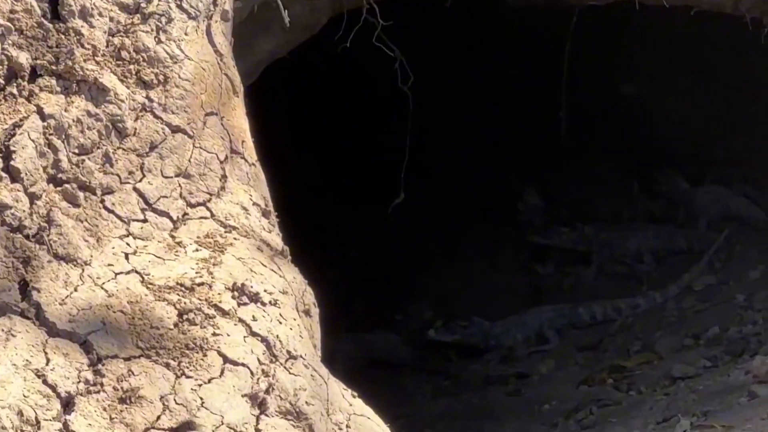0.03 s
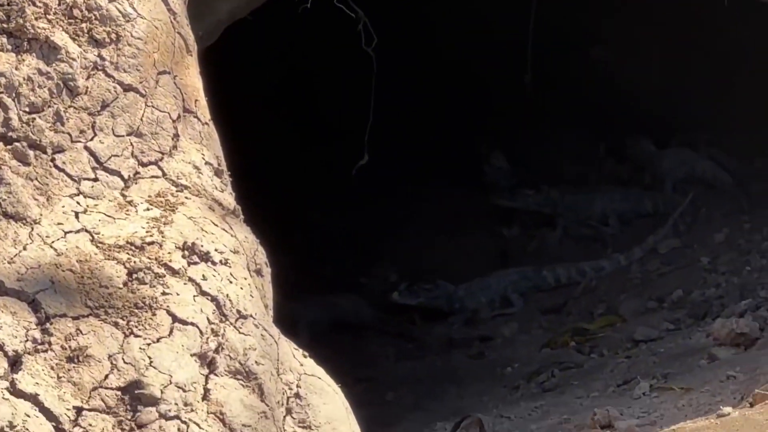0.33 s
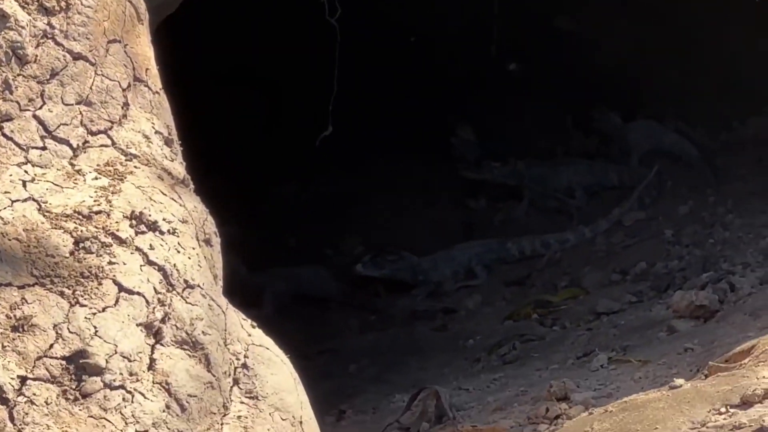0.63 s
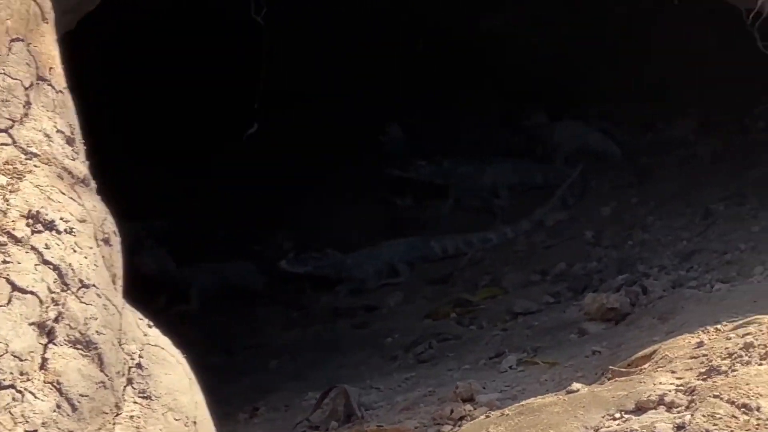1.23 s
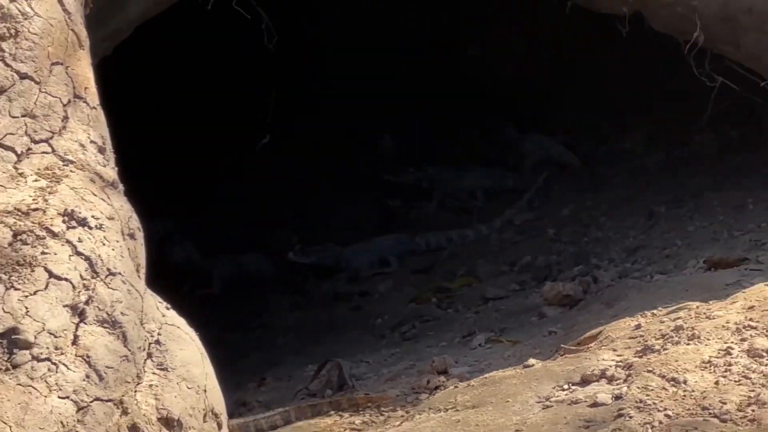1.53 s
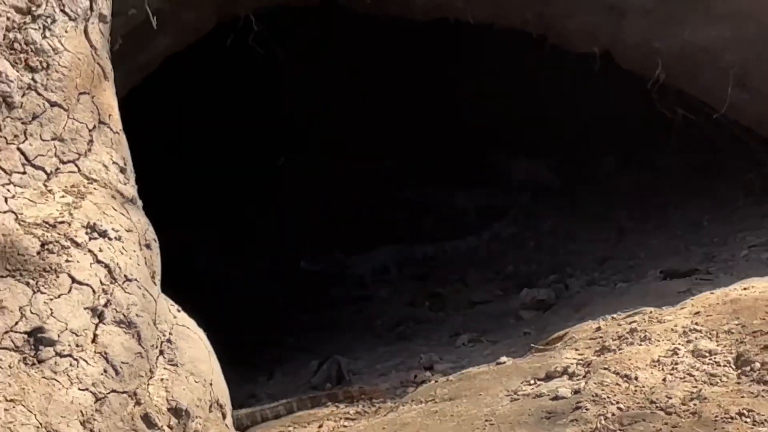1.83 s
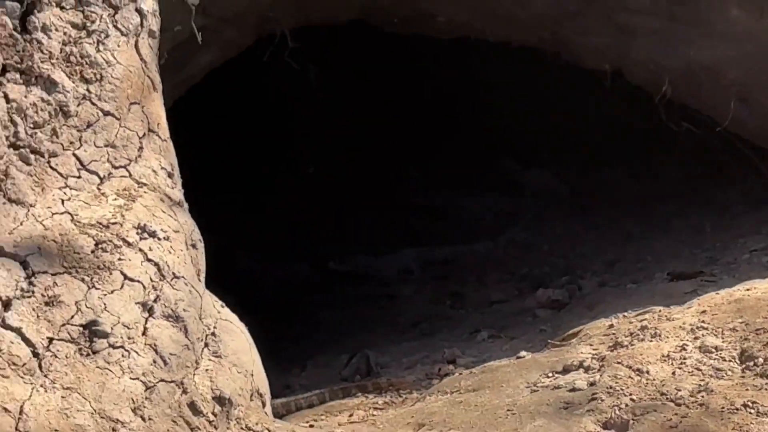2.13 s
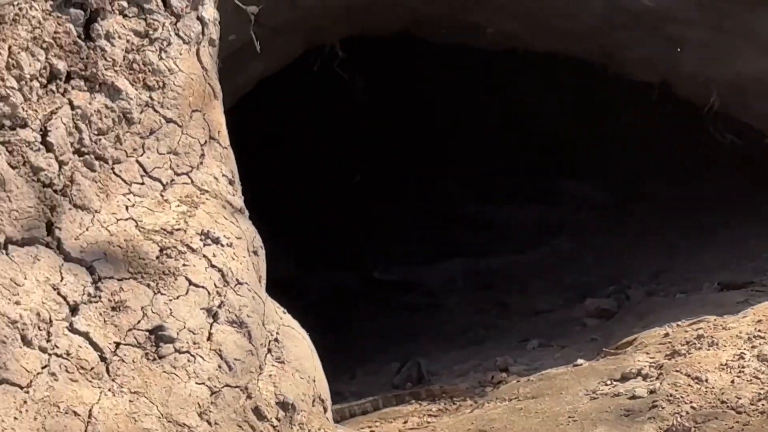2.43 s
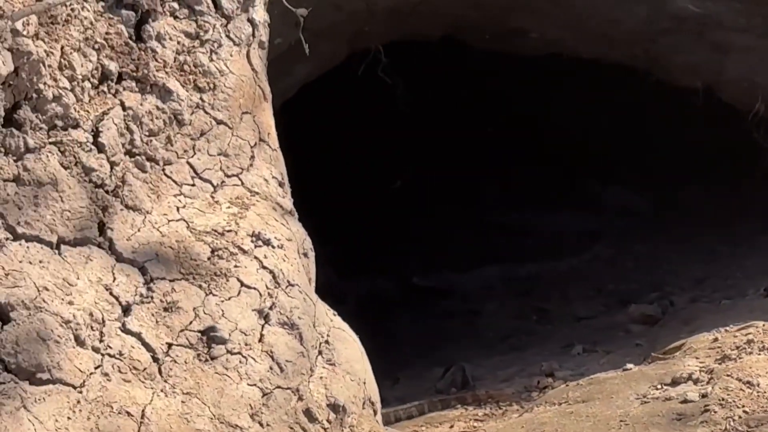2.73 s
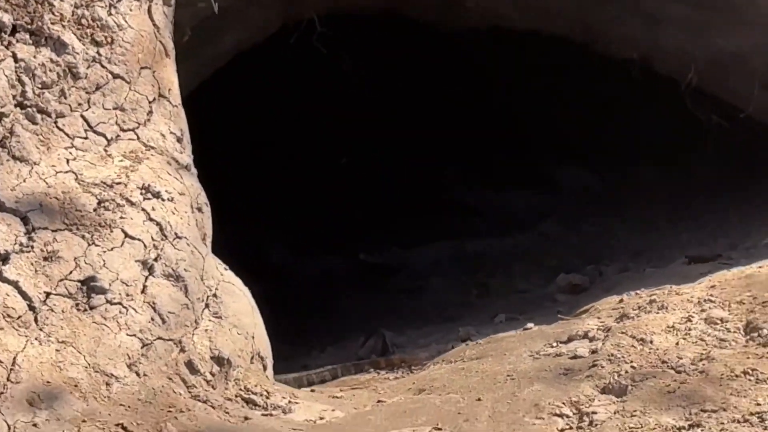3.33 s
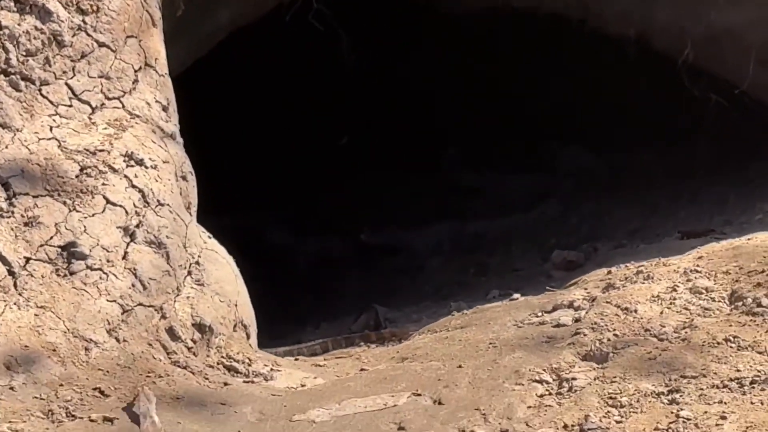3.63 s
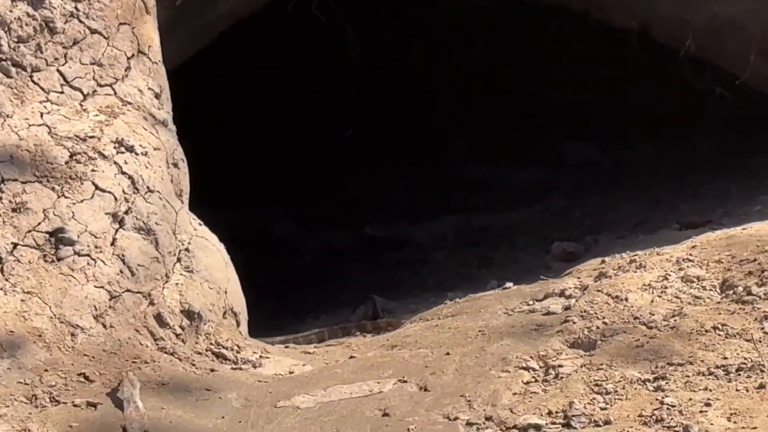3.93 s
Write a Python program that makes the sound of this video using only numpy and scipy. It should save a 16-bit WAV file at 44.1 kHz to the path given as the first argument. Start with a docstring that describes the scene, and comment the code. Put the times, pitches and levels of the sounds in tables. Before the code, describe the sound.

Soft, short honks of young alligators overlap amid high insect buzzing and faint camera rumble.

```python
"""Young alligators honk softly from a den in a dry mud bank: short arched calls and falling yelps,
each a run of harmonics through a narrow throat resonance, overlap and ring in the hollow.
Two insects buzz high in the grass close by, pulsing with their wing strokes, over a distant chorus
and a light wind. The microphone is on a hand-held camera that rumbles and is bumped now and then;
dry soil scuffs faintly near it."""
import sys
import numpy as np
from scipy import signal
from scipy.fft import rfft, irfft, next_fast_len
from scipy.io import wavfile
from scipy.ndimage import uniform_filter1d, map_coordinates

SR = 44100
rng = np.random.default_rng(int(sys.argv[2]) if len(sys.argv) > 2 else 0)


def transcribe(signal):
    """Save signal, clipped to [-1, 1], as a 16-bit WAV file at the path in sys.argv[1]."""
    frames = np.atleast_2d(signal).T
    limited = np.clip(frames, -1, 1)
    pcm = np.round(limited * 32767).astype(np.int16)
    wavfile.write(sys.argv[1], SR, pcm)


N = 176400

# light wind, common to both channels (mid) and opposed between them (side): (frequency [Hz], level [dB])
WIND_MID_COLOUR = [(30, -12.5), (200, 6.5), (400, 0), (600, 0), (1200, -3), (2400, -3), (3000, -4.5),
                   (4000, -10), (5000, -16.5), (7000, -4), (12000, -29.5)]
WIND_SIDE_COLOUR = [(30, -10), (70, -10), (150, 8.5), (300, 8.5), (600, 11.5), (1000, 7.5), (1600, 7),
                    (2200, -53), (4000, -41), (9000, -25)]
# scuffs near the microphone: (time [s], length [s], level [dB])
SOIL_SCUFFS = [(0.613, 0.0081, -61), (1.04, 0.0071, -77), (2.109, 0.015, -60), (2.803, 0.092, -62),
               (3.492, .012, -70)]
# dry soil: (frequency [Hz], level [dB])
SOIL_COLOUR = [(150, -9), (400, -3.5), (750, -1.5), (1200, -19), (3000, -66), (9000, -25)]
# bumps on the camera: (time [s], level [dB], pitch [Hz], half length [cycles], rub re bump [dB])
CAMERA_BUMPS = [(1.932, -34, 74.5, 1.3, -32), (1.992, -39.5, 66, 2.2, -28), (2.045, -41, 115, 0.37, -28),
                (2.099, -27, 75.5, 0.61, -23), (2.106, -36, 188, .7, -23), (2.146, -30, 73, .7, -20),
                (2.179, -38.5, 184, 0.68, -31), (2.186, -31.5, 84, 0.54, -24), (2.217, -38, 104, 1, -10),
                (2.439, -35.5, 50.7, 0.96, -28), (2.675, -34.5, 67.4, 1.2, -34),
                (2.716, -27.5, 59.8, 1.16, -28.5), (2.806, -34, 57.3, 0.68, -30),
                (3.46, -32.5, 69.6, 0.74, -28), (3.501, -31.5, 67.5, 1.33, -27),
                (3.523, -35.5, 144, 0.91, -26), (3.574, -34, 81, 0.52, -29), (3.62, -34, 73, 1.4, -42),
                (3.664, -33.5, 74, 0.66, -27), (3.815, -36, 50, 0.83, -36)]
# handling rumble and the rub of the grip: (frequency [Hz], level [dB])
RUMBLE_COLOUR = [(15, -16), (28, -11), (45, -2), (62, 3), (100, -1.5), (160, -10.5), (240, -17.5),
                 (330, -34.5), (600, -53), (2000, -74)]
GRIP_COLOUR = [(70, -33), (130, 21), (220, 3), (300, -8), (450, -24), (900, -44)]
# rumble as the camera moves: (time [s], level [dB])
RUMBLE_SWELL = [(0, -55), (.5, -56), (1.75, -54), (1.95, -47.5), (2.1, -42.5), (2.22, -47), (2.28, -54),
                (2.55, -51.5), (2.72, -44), (2.88, -48.5), (3.38, -52.5), (3.5, -46), (3.68, -49), (4, -54)]
# the two near insects and the distant chorus: (time [s], level [dB])
SLOW_BUZZ_LEVEL = [(0, -53), (.4, -49.5), (.7, -48.5), (1.1, -49.5), (1.58, -47.5), (1.7, -61), (2.1, -51),
                   (2.65, -53.5), (2.87, -48.5), (3.3, -47.5), (3.6, -48), (4, -55)]
FAST_BUZZ_LEVEL = [(0, -47.5), (.55, -47), (.63, -62), (1.08, -64), (1.24, -45.5), (1.63, -47.5),
                   (1.68, -56), (2.25, -74), (2.36, -47), (2.82, -45), (2.95, -55), (3.42, -58),
                   (3.55, -47.5), (4, -47)]
FAR_CHORUS_LEVEL = [(0, -51.5), (.4, -48.5), (1.55, -49), (1.75, -50), (2.3, -50), (2.8, -50.5),
                    (3.7, -47.5), (4, -51)]
# the same three insect sounds: (frequency [Hz], level [dB])
SLOW_BUZZ_COLOUR = [(4000, -53), (7000, -27), (9500, -8.5), (11300, -8.5), (12500, 0.5), (13700, 1),
                    (14500, -7.5), (15900, -8.5)]
FAST_BUZZ_COLOUR = [(4000, -54), (8000, -19.5), (10500, -13), (11500, -8), (12500, -12), (13700, -2.5),
                    (15200, -2.5), (15900, -7)]
FAR_CHORUS_COLOUR = [(2000, -37), (5000, -21), (6500, -20.5), (8000, -2.5), (9700, 2), (11300, 5.5),
                     (12800, 1), (15200, 7), (15900, 6)]
# insects at the microphone: (frequency [Hz], phase of left ahead of right [rad])
INSECT_PHASE = [(0, 0), (6500, .3), (8000, 1.15), (9500, 1.8), (11000, 2.35), (12000, 3.03), (13400, 3.24),
                (14200, 3.72), (15800, 4.35)]
# hissy edge of the calls and their diffuse wash in the den: (frequency [Hz], level [dB])
EDGE_COLOUR = [(2000, -10), (3000, 4), (4300, 6), (5700, 11.5), (6500, 10.5), (8000, -31)]
WASH_COLOUR = [(900, -39), (1250, -17), (1430, 6), (1750, 7), (1950, -2.5), (2250, -46), (3000, -32)]
# strength of the hissy edge: (time [s], level re calls [dB])
EDGE_BALANCE = [(0, -35), (2.3, -18.5), (2.9, -15), (3.3, -11.5), (3.7, -11.5), (3.9, -18)]
# alligator calls: (time [s], length [s], time to crest [s], crest pitch [Hz], fall [share of pitch],
# throat resonance [Hz], level [dB], lag of right behind left [ms])
CALLS = [ (.205, .125, 0.037, 322, 0.178, 1520, -69.5, .044),
         (0.214, 0.1, 0.029, 437, 0.154, 1670, -77.5, 0.028), (.51, .115, .04, 486, .23, 1790, -61.5, .021),
         (.51, 0.12, 0.064, 375, 0.038, 1380, -62.5, 0.13), (.592, .09, .02, 450, .19, 1690, -62, .029),
         (0.717, 0.14, .075, 364, .05, 1740, -68.5, 0.015), (.815, 0.08, .051, 371, .033, 1260, -70, 0.096),
         (.88, .135, .039, 466, .39, 1690, -58.5, .021), (.882, .052, .008, 375, .19, 1380, -63, .14),
         (.912, 0.052, 0.028, 368, 0.049, 1450, -70, .12),
         (1.079, 0.13, 0.062, 353.4, .11, 1740, -64, 0.027),
         (1.1, 0.12, 0.032, 371, 0.034, 1820, -73, .025),
         (1.205, .12, 0.026, 338, 0.22, 1540, -66.5, 0.049),
         (1.327, 0.077, .04, 360, .037, 1610, -71.5, 0.041),
         (1.445, 0.16, 0.043, 472, 0.18, 1770, -65.5, 0.016),
         (1.537, 0.12, 0.025, 328, 0.15, 1520, -64, 0.091),
         (1.553, 0.082, 0.026, 460, .13, 1780, -75, 0.023),
         (1.683, .105, 0.05, 350, 0.031, 1730, -64, 0.017),
         (1.814, 0.093, 0.025, 433, 0.18, 1630, -61.5, 0.028),
         (1.864, 0.07, 0.012, 468, 0.24, 1700, -61.5, 0.02),
         (1.88, 0.072, .021, 379, 0.066, 1510, -65, 0.12),
         (1.897, 0.058, 0.013, 463, 0.15, 1760, -68, 0.023),
         (1.937, 0.043, 0.016, 458, 0.29, 1710, -64, 0.023),
         (1.988, .135, .08, 337, .07, 1670, -64.5, 0.023), (2.06, 0.136, .075, 359, 0.04, 1760, -65, 0.014),
         (2.292, 0.11, .038, 463.5, 0.27, 1735, -59.5, 0.013),
         (2.346, 0.1, 0.013, 492, .18, 1780, -64, 0.016), (2.405, 0.087, .022, 470, .13, 1820, -67, 0.019),
         (2.508, 0.11, .055, 339, 0.043, 1530, -62.5, .067),
         (2.494, 0.15, 0.067, 405, 0.045, 1940, -71.5, 0.019),
         (2.692, 0.094, 0.029, 315, .12, 1530, -71, 0.049),
         (2.891, 0.066, 0.039, 354, 0.024, 1400, -55.5, 0.23),
         (2.971, 0.047, 0.029, 359, .04, 1390, -61, 0.24),
         (2.89, .087, 0.056, 361, 0.089, 1770, -62, 0.027),
         (2.964, 0.06, 0.0145, 450, .17, 1670, -62.5, 0.022),
         (2.953, 0.099, .055, 321, 0.042, 1500, -61, .043),
         (3.04, 0.095, 0.063, 309.6, 0.0074, 1450, -67, 0.093),
         (3.09, 0.12, 0.07, 356, 0.026, 1730, -61.5, 0.025),
         (3.11, 0.11, 0.069, 388, 0.045, 1395, -64, 0.13),
         (3.234, .12, 0.057, 352.5, 0.095, 1360, -62.5, 0.2),
         (3.255, .09, .045, 352, 0.044, 1720, -69.5, .025), (3.318, 0.052, .03, 316, .03, 1560, -62, 0.049),
         (3.393, 0.053, 0.0081, 442, 0.13, 1700, -69, 0.027),
         (3.407, 0.1, .056, 317.5, .023, 1620, -65.5, 0.034),
         (3.56, 0.11, 0.047, 350, 0.059, 1620, -62.5, 0.036),
         (3.646, 0.084, 0.034, 470, 0.17, 1710, -58, 0.03),
         (3.708, 0.08, 0.019, 465, 0.2, 1760, -62, 0.017),
         (3.709, .12, 0.047, 402, 0.086, 1850, -67.5, 0.018),
         (3.837, 0.12, .072, 356, 0.051, 1740, -58.5, 0.032),
         (3.912, 0.11, 0.038, 367, 0.15, 1430, -59.5, 0.16)]

OPPOSED = np.array([[1], [-1]])  # left, right


def amp(db):
    """Decibels to gain."""
    return 10 ** (np.asarray(db) / 20)


def unit(x):
    """x at rms 1."""
    return x / np.sqrt(np.mean(x ** 2) + 1e-20)


def curve(rows):
    """(time [s], value) points as one value per sample."""
    return np.interp(np.arange(N) / SR, *np.transpose(rows))


def wobble(rate, size=N):
    """A smooth random curve, rate knots a second."""
    return map_coordinates(rng.standard_normal(4000), [np.arange(size) * rate / SR + 3], mode='wrap')


def filtered(x, response):
    """x through a response given as a function of frequency."""
    size = next_fast_len(N + 8192)
    return irfft(rfft(x, size) * response(np.fft.rfftfreq(size, 1 / SR)), size)[..., :N]


def noise(colour):
    """Noise of rms 1, shaped by (frequency [Hz], level [dB]) points."""
    points_hz, db = np.transpose(colour)
    white = rng.standard_normal(N)
    return unit(filtered(white, lambda hz: amp(np.interp(np.log(hz + 1), np.log(points_hz), db))))


def add(track, s, sound):
    """Mix a sound into a track at s seconds."""
    part = track[..., round(s * SR):][..., :sound.shape[-1]]
    part += sound[..., :part.shape[-1]]


def wind(mid_db=-63.5, side_db=-68.5):
    """Light, nearly steady wind over the bank, wide in the low middle and centred above."""
    gust = amp(.92 * wobble(4.24))
    mid = amp(mid_db) * noise(WIND_MID_COLOUR)
    side = amp(side_db) * noise(WIND_SIDE_COLOUR)
    return gust * (mid + OPPOSED * side)


def scuffs():
    """Faint puffs of dry soil near the microphone."""
    t = np.arange(N) / SR
    swell = sum(amp(db) * np.exp(-(2 * (t - s) / length) ** 2) for s, length, db in SOIL_SCUFFS)
    return swell * np.array([noise(SOIL_COLOUR), noise(SOIL_COLOUR)])


def handling(side_db=-25.5):
    """Handling noise on the microphone: a rumble that swells as the camera moves, and dull bumps."""
    t = np.arange(N) / SR
    swell = amp(curve(RUMBLE_SWELL))
    mid = swell * noise(RUMBLE_COLOUR)
    rub = noise(GRIP_COLOUR)
    for s, db, hz, half_length, rub_db in CAMERA_BUMPS:
        cycles = (t - s) * hz
        envelope = amp(db) * np.exp(-(cycles / half_length) ** 2)
        mid += envelope * (np.cos(2 * np.pi * cycles) + amp(rub_db) * rub)
    side = swell * amp(side_db) * noise(RUMBLE_COLOUR)
    return mid + OPPOSED * side


def buzz(level, colour, stroke_hz, drift=.016, swing_db=4, scatter_db=1.1, waver_db=1):
    """One insect close by in the grass: high noise that swells at every wing stroke."""
    strokes = np.cumsum(stroke_hz * (1 + drift * wobble(5.6))) / SR
    pulse_db = swing_db * np.cos(2 * np.pi * strokes) + scatter_db * wobble(46) + waver_db * wobble(9.9)
    return amp(curve(level)) * unit(amp(pulse_db)) * noise(colour)


def insects():
    """Two near insects over a distant chorus; their treble is out of phase between the channels."""
    slow = buzz(SLOW_BUZZ_LEVEL, SLOW_BUZZ_COLOUR, stroke_hz=48.1)
    fast = buzz(FAST_BUZZ_LEVEL, FAST_BUZZ_COLOUR, stroke_hz=65.6)
    chorus = amp(curve(FAR_CHORUS_LEVEL)) * noise(FAR_CHORUS_COLOUR)
    points_hz, phase = np.transpose(INSECT_PHASE)
    return filtered(slow + fast + chorus, lambda hz: np.exp(.5j * OPPOSED * np.interp(hz, points_hz, phase)))


def den(call, echo_db, t60_s=.45):
    """A call plus the short echo of the earth hollow, partly shared by the two channels."""
    t = np.arange(SR // 2) / SR
    tail = rng.standard_normal((2, len(t))) * amp(-60 * t / t60_s)
    tail = tail + .5 * tail[::-1]
    response = amp(echo_db) * tail / np.linalg.norm(tail[0])
    response[:, 0] = 1  # direct path to the microphone
    return signal.fftconvolve(call, response, axes=1)


def den_wash(call_power, wash_db=-7.5, decay_s=.1):
    """A diffuse band of noise that lingers in the den after the calls."""
    pole = np.exp(-1 / (decay_s * SR))
    lingering = np.sqrt(signal.lfilter([1 - pole], [1, -pole], call_power))
    centre = noise(WASH_COLOUR)
    spread = .22 * np.array([noise(WASH_COLOUR), noise(WASH_COLOUR)])
    return amp(wash_db) * lingering * unit(centre + spread)


def honk(length, crest, pitch_hz, fall, throat_hz, lag_ms):
    """One call: harmonics of an arched, slightly rough pitch through a narrow throat resonance."""
    jitter, rasp_db, shimmer_db = .0085, -14, 2
    attack_share, release_share = .4, .28
    throat_width_hz = .82 * pitch_hz
    t = np.arange(int(length * SR)) / SR
    # the pitch climbs on a parabola, steeper in yelps that fall far, then drops ever faster
    scoop = (14 + 210 * fall) * np.minimum(t - crest, 0) ** 2
    past_crest = np.maximum(t - crest, 0) / max(length - crest, .005)
    hz = pitch_hz * (1 - scoop - fall * past_crest ** 1.35)
    hz *= 1 + jitter * wobble(217.6, len(t))
    cycles = np.cumsum(hz) / SR + OPPOSED / 2 * hz * lag_ms / 1000
    voice = 0
    for harmonic in range(1, 10):
        resonance = 1 / (1 + (2 * (harmonic * hz - throat_hz) / throat_width_hz) ** 2)
        rasp = amp(rasp_db) * (wobble(399, len(t)) + 1j * wobble(409.4, len(t)))
        voice += resonance * np.real((1 + rasp) * np.exp(2j * np.pi * harmonic * cycles))
    attack = np.sin(np.pi / 2 * np.minimum(t / length / attack_share, 1))
    release = np.sin(np.pi / 2 * np.minimum((1 - t / length) / release_share, 1))
    shimmer = amp(shimmer_db * wobble(64, len(t)))
    return unit(voice) * attack * release * shimmer


def alligators(typical_db=-63, den_db=-4.5, drier_db_per_db=.7):
    """Each call comes from its own spot in the den; a hissy edge and a wash follow their loudness."""
    calls = np.zeros((2, N))
    for s, length, crest, pitch_hz, fall, throat_hz, db, lag_ms in CALLS:
        # louder calls are nearer the mouth of the den, so drier
        echo_db = den_db - drier_db_per_db * max(db - typical_db, 0)
        call = honk(length, crest, pitch_hz, fall, throat_hz, lag_ms)
        add(calls, s, amp(db) * den(call, echo_db))
    power = np.abs(uniform_filter1d(calls[0] ** 2, size=600))
    wash = den_wash(power)
    edge = np.sqrt(power) * amp(curve(EDGE_BALANCE)) * noise(EDGE_COLOUR)
    return calls + edge + wash


def scene():
    """At the mud bank: calls from the den, insects and wind around it, handling and scuffs up close."""
    return alligators() + insects() + wind() + handling() + scuffs()


def record(dry, top_hz=15850):
    """The camera's microphone channels keep nothing above their band limit."""
    return filtered(dry, lambda hz: hz < top_hz)


dry = scene()
out = record(dry)
transcribe(out)
```